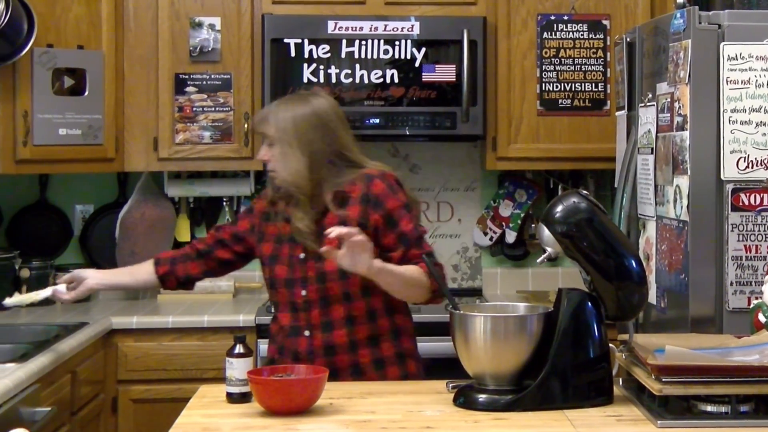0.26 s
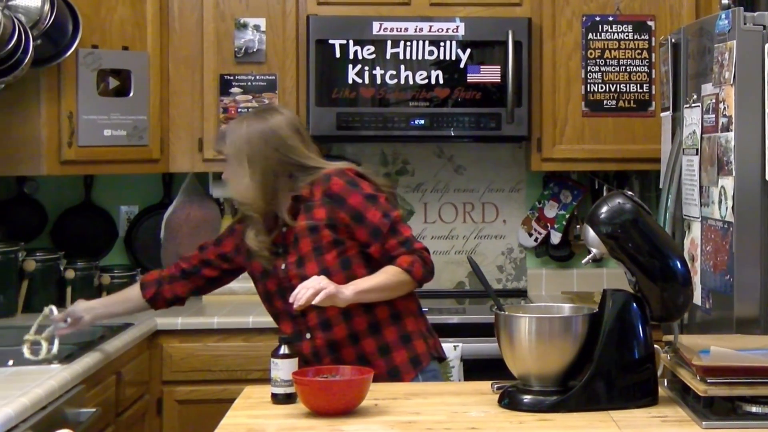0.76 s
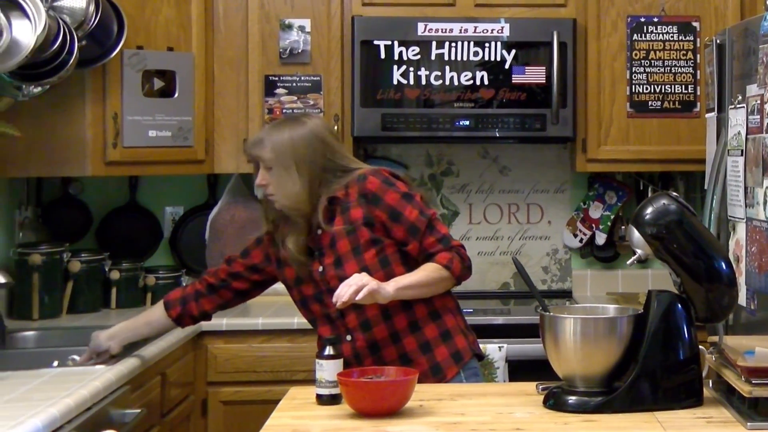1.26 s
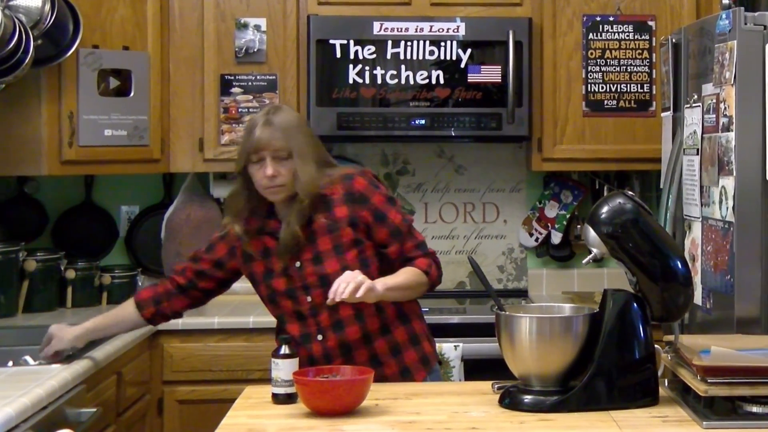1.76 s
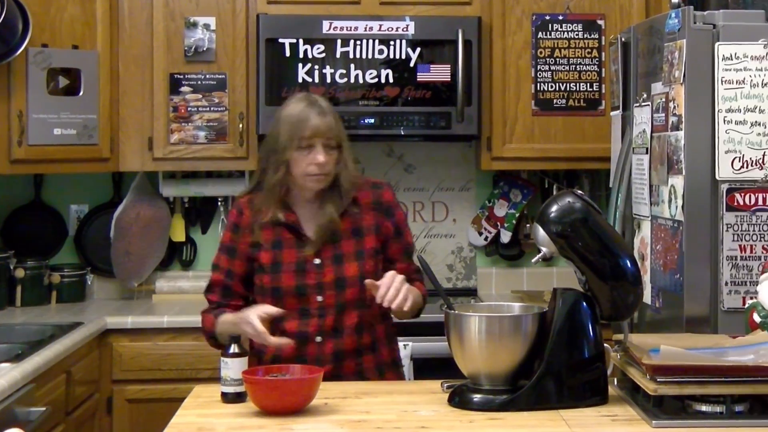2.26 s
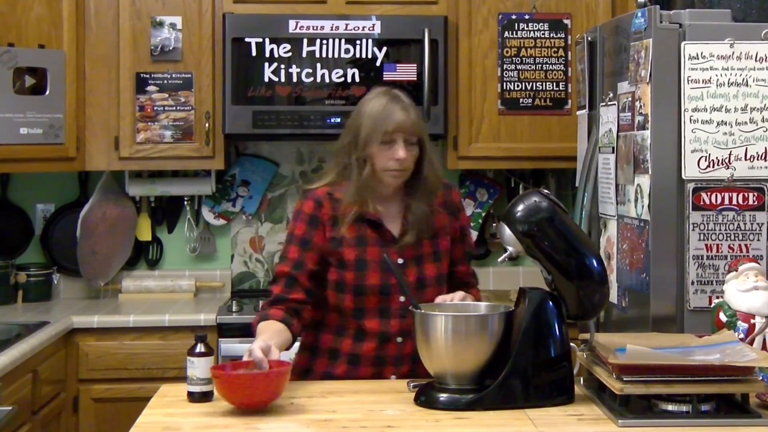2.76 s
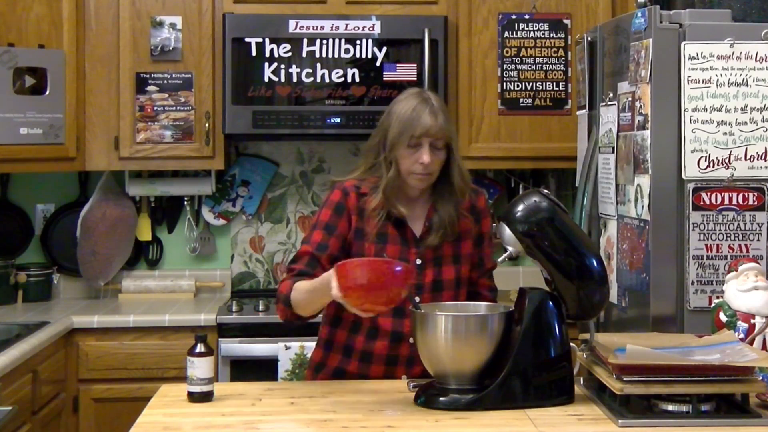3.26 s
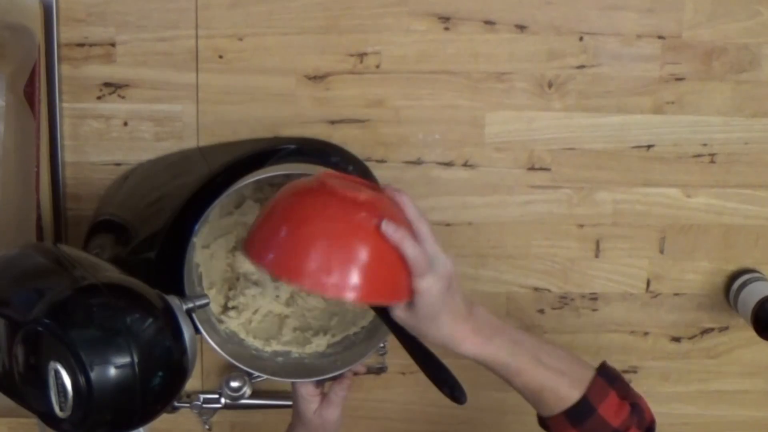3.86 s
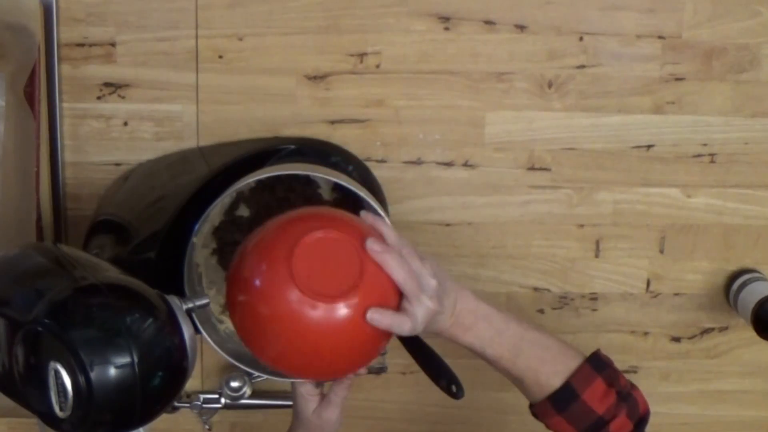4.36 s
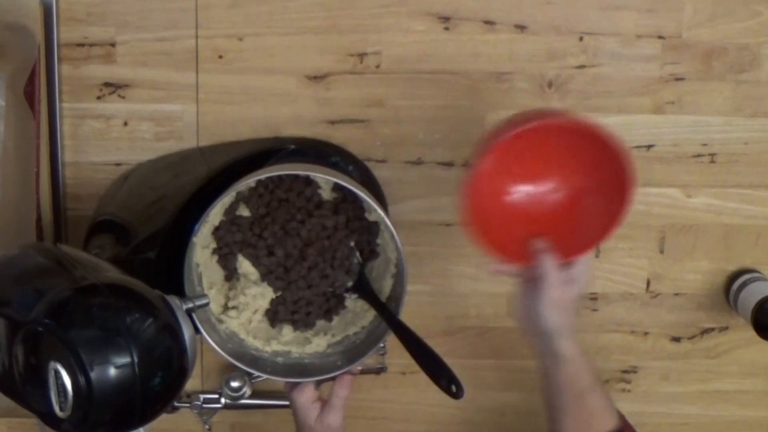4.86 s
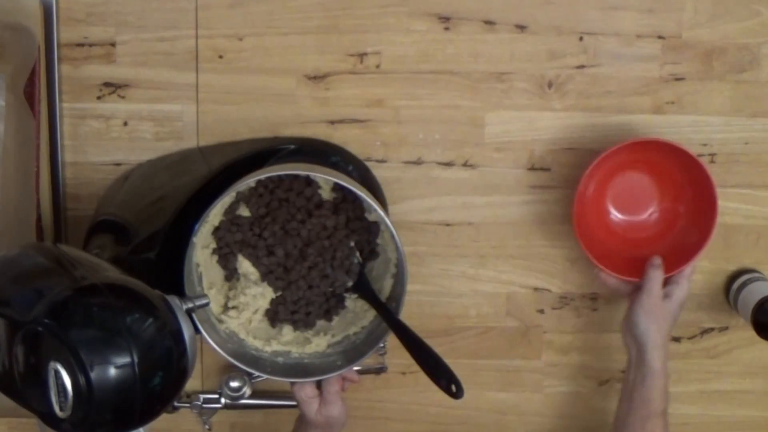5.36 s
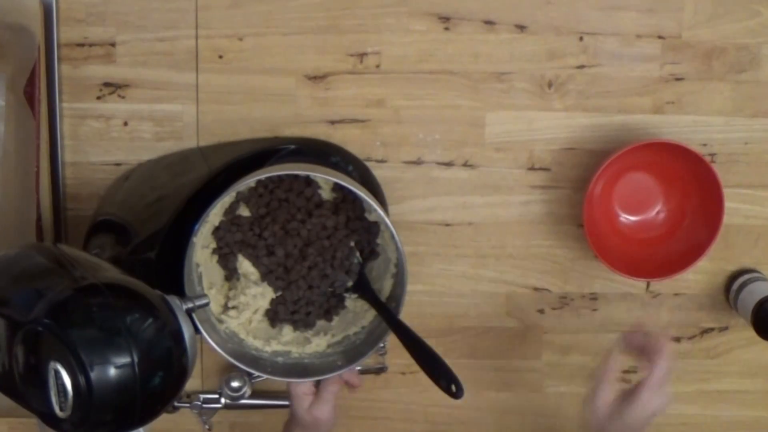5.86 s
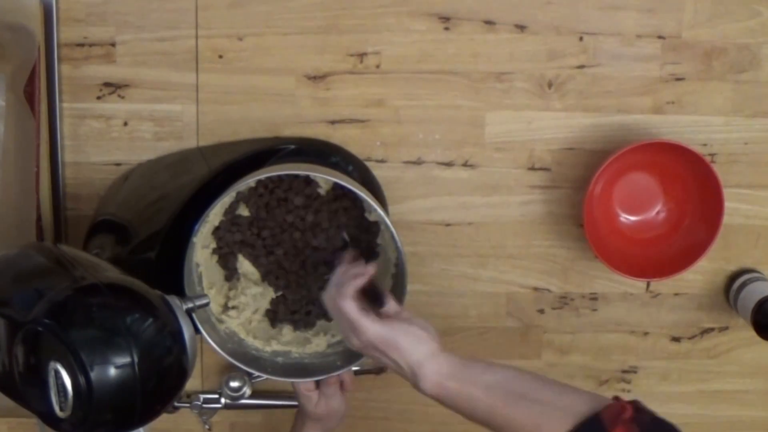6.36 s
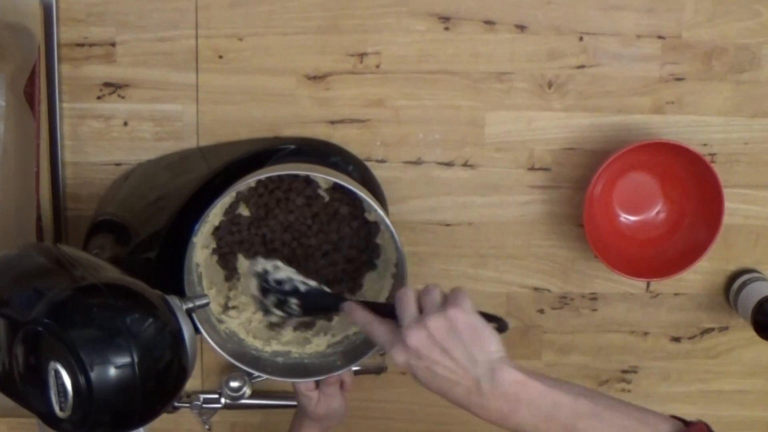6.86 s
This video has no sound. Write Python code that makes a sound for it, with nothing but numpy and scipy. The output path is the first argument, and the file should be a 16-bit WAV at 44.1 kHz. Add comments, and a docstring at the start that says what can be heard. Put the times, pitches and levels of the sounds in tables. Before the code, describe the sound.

In a quiet kitchen with a faint low motor hum, a flannel shirt rustles and a mixer paddle thuds in a sink, then clanks brightly. Chocolate chips patter and slide in a rush from a plastic bowl onto dough. The empty bowl knocks and rocks on a wooden worktop, the hum fades, and a spatula softly folds the dough. Close microphone, short room echo.

```python
"""A low, slightly wavering motor hum over dull room air, with light ticks of handling, opens a close kitchen scene.
A flannel shirt rustles by stick-slip friction; a mixer paddle bumps the sink and clanks over by modal ringing.
Chocolate chips tumble, then slide, from a plastic bowl onto dough, as scattered contacts over a granular rub.
The empty bowl rocks down on a wooden worktop as damped modes with noisy cracks, and the hum dies away.
A spatula starts to fold the dough: friction noise in slow swells, with one deep, soft bump."""
import sys
import numpy as np
from scipy import signal
from scipy.fft import rfft, irfft, next_fast_len
from scipy.io import wavfile
from scipy.ndimage import uniform_filter1d

SR = 44100
rng = np.random.default_rng(int(sys.argv[2]) if len(sys.argv) > 2 else 0)


def pcm_store(signal):
    """Save signal as 16-bit PCM."""
    levels = np.round(np.clip(np.atleast_2d(signal), -1, 1) * 32767)
    wavfile.write(sys.argv[1], SR, levels.astype(np.int16).T)


N = 314433
TIME = np.arange(N) / SR


def undb(db):
    """Level law: decibels to amplitude gain."""
    return 10 ** (np.asarray(db) / 20)


def unit(x):
    """Power normalisation: scale to rms 1."""
    return x / np.sqrt(np.mean(x ** 2))


def add(out, s, sound):
    """Superposition: mix a sound in at time s."""
    i = int(s * SR)
    out[i:i + len(sound)] += sound[:N - i]


def colour(x, points):
    """Minimum-phase filtering: a causal response through (f/Hz, level/dB) points, with unit power gain."""
    n = 2 * next_fast_len(len(x))
    hz, db = np.transpose(points)
    bin_hz = np.arange(n // 2 + 1) * SR / n
    gain = undb(np.interp(np.log(bin_hz + 1), np.log(hz), db))
    # folding the cepstrum onto positive times makes the filter causal
    cepstrum = irfft(np.log(unit(gain)))
    cepstrum[1:n // 2] *= 2
    cepstrum[n // 2 + 1:] = 0
    response = np.exp(rfft(cepstrum))
    return irfft(rfft(x, n) * response)[:len(x)]


def band(x, hz, q):
    """Resonance: a single peak with its sharpness Q."""
    centre = min(hz, SR / 3)
    sharpness = max(q, 2 * hz / SR * 2)
    return signal.lfilter(*signal.iirpeak(centre, sharpness, fs=SR), x)


def fade(t, t60):
    """Exponential damping: the level falls 60 dB in t60 seconds."""
    return np.exp(-np.log(1000) * t / t60)


def walk(rate):
    """Slow random modulation: smoothed random steps, rms 1."""
    k = int(SR / rate)
    steps = np.repeat(rng.standard_normal(N // k + 1), k)
    return unit(uniform_filter1d(steps, k)[:N])


def blows(hits, modes, spectrum, ring_db, crack_db, tail_db, crack_t60, low_t60, high_t60):
    """Modal impact: each blow cracks, rings modes and stirs a dense tail; soft contact dulls all three."""
    t = np.arange(SR) / SR
    ring = np.zeros(len(t))
    for k, (hz, db, t60) in enumerate(modes):
        # neighbouring modes start in opposite phase
        ring += (-1) ** k * undb(db) * np.sin(2 * np.pi * hz * t) * fade(t, t60)
    lowpass = signal.butter(2, 1800, fs=SR, output="sos")
    out = np.zeros(N)
    for s, db, soft_ms in hits:
        noise = rng.standard_normal(len(t))
        low = signal.sosfilt(lowpass, noise)
        tail = low * fade(t, low_t60) + (noise - low) * fade(t, high_t60)
        crack = rng.standard_normal(len(t)) * fade(t, crack_t60)
        rough = colour(undb(crack_db) * crack + undb(tail_db) * tail, spectrum)
        sound = undb(ring_db) * ring + rough
        pole = np.exp(-1000 / (soft_ms * SR))
        add(out, s, undb(db) * signal.lfilter([1 - pole], [1, -pole], sound))
    return out


def clicks(hits, rise_s, t60, q, rattle_db, rattle_t60):
    """Contact transients: tiny hard snaps with a weak rattle, each with its own brightness."""
    t, out = np.arange(SR // 20) / SR, np.zeros(N)
    shape = (1 - np.exp(-t / rise_s)) * (fade(t, t60) + undb(rattle_db) * fade(t, rattle_t60))
    shape = shape / shape.max()
    for s, db, hz in hits:
        snap = band(rng.standard_normal(len(t)) * shape, hz, q)
        # the contact time rounds off what lies an octave above
        snap = signal.lfilter(*signal.butter(2, min(2 * hz, SR * .45), fs=SR), snap)
        add(out, s, undb(db) * unit(snap) * np.sqrt(np.mean(shape ** 2)))
    return out


def grains(rate, spread_db, t60, smooth_db):
    """Granular friction: countless small contacts of unequal size over a smooth rub; rms 1."""
    struck = rng.random(N) < rate / SR
    sizes = struck * undb(spread_db * np.minimum(rng.exponential(size=N), 4))
    power = signal.lfilter([1], [1, -fade(1 / SR, t60) ** 2], sizes ** 2 + 1e-18)
    envelope = np.sqrt(power / power.mean() + undb(smooth_db) ** 2)
    return unit(rng.standard_normal(N) * envelope)


def pellets(flow, count, spread_db, centre_hz, octaves):
    """Random arrivals: (t/s, level/dB, f/Hz) contacts whose base level follows the movement's swell."""
    s, db, rise, hold, fall = flow
    chance = rng.random((count, 3))
    times = s - rise + (rise + hold + 2 * fall) * (np.arange(count) + chance[:, 0]) / count
    levels = swell(times, *flow) + spread_db * chance[:, 1] ** 2
    brightness = centre_hz * 2 ** (octaves * (chance[:, 2] - .5))
    return np.transpose([times, levels, brightness])


# a movement lies SWELL_DB down one rise before and one fall after its hold
SWELL_DB, SWELL_BEND = 20, 1.5


def swell(t, s, db, rise, hold, fall):
    """Movement envelope: level in dB at times t as one movement swells, holds and dies away."""
    away = np.maximum((s - t) / rise, 0) + np.maximum((t - s - hold) / fall, 0)
    return db - SWELL_DB * np.minimum(away, 10) ** SWELL_BEND


def strokes(rows):
    """Superposed envelopes: gain over time of several movements."""
    return sum(undb(swell(TIME, *row)) for row in rows)


def kitchen(x, wet_db, t60):
    """Diffuse reverberation: a short echo from cupboards and walls."""
    t = np.arange(SR // 2) / SR
    echo = rng.standard_normal(len(t)) * fade(t, t60) * (t > .006)
    echo = colour(echo, [(200, -1), (7000, -11), (16000, -24.5)])
    echo = echo / np.linalg.norm(echo)
    return x + undb(wet_db) * signal.fftconvolve(x, echo)[:N]


# partials of the motor hum [f/Hz, relative level/dB]
HUM_PARTIALS = [(52.1, -43.5), (104.2, -56.5), (120, -55)]
# spectrum of the room air [f/Hz, relative level/dB]
AIR_SPECTRUM = [(20, -1), (40, -4), (55, -5.5), (120, -10), (250, -10.5), (400, -14.5), (600, -17),
                (850, -24.5), (1250, -25.5), (1600, -29), (4000, -38), (4800, -38), (10000, -41),
                (16000, -47.5)]
HUM_ENDS_S, HUM_FADE_DB_PER_S = 5.75, 28


def background():
    """Tones over broadband noise: a wavering motor hum, later dying away, over the dull air of the room."""
    hum = np.zeros(N)
    for hz, db in HUM_PARTIALS:
        level = undb(db + 0.13 * walk(7))
        hum += level * np.sqrt(2) * np.sin(2 * np.pi * (hz * TIME + rng.random()))
    air = colour(rng.standard_normal(N), AIR_SPECTRUM) * undb(-50 + .5 * walk(4))
    return hum * undb(.5 - HUM_FADE_DB_PER_S * np.maximum(TIME - HUM_ENDS_S, 0)) + air


# the clearest ticks of handling, and one stray chip ticking at 4.67 s [t/s, relative level/dB, brightest f/Hz]
HANDLING_TICKS = [(.1135, -32.5, 3500), (1.135, -31, 5000), (1.170, -28, 7100), (1.1755, -27.5, 6300),
                  (1.7955, -30.5, 6260), (1.917, -31.5, 7950), (2.500, -34, 5460), (2.604, -39, 5960),
                  (2.6894, -38.5, 5060), (2.909, -38, 8000), (3.2666, -41.5, 8000), (4.6706, -33.5, 10000),
                  (5.2775, -35, 6000), (5.3535, -28.5, 11000), (5.3638, -31.5, 6040), (5.405, -35, 6800),
                  (5.4361, -32, 6100), (5.620, -38, 6900), (6.1473, -24, 5360), (6.4561, -37, 11100),
                  (6.594, -40, 5940), (6.817, -32.5, 6500), (7.0808, -31, 8500)]
# fingers squeak and scuff on the bowls [t/s, level/dB, f/Hz, length/s, sharpness Q]
FINGER_SQUEAKS = [(2.736, -57, 1230, .04, 1.9), (5.41, -58, 2800, 0.029, 7.3), (5.458, -55, 2780, .05, 9),
                  (6.176, -59, 2820, 0.048, 8.2)]


def handling():
    """Contact and friction: light ticks, and brief squeaks and scuffs of fingers as resonant noise."""
    out = undb(-2.5) * clicks(HANDLING_TICKS, rise_s=.0005, t60=.0024, q=1, rattle_db=-27, rattle_t60=.02)
    for s, db, hz, length, q in FINGER_SQUEAKS:
        noise = rng.standard_normal(int(length * SR))
        rub = band(band(noise, hz, q), hz, q)
        add(out, s, undb(db) * unit(rub * np.hanning(len(rub))))
    return kitchen(out, wet_db=-18.5, t60=0.39)


# the shirt rubs as arm and body move [t/s, relative level/dB, rise/s, hold/s, fall/s]
SHIRT_MOVES = [(.565, -57, .01, .03, .05), (.685, -40.5, .115, .025, .25), (.9, -52.5, .05, .06, .03),
               (1.13, -53, .13, .06, .14), (1.735, -52, .02, .01, .06), (1.96, -45.3, .27, .41, .19),
               (2.71, -52, .07, .12, .12), (2.92, -50, .03, .09, .04), (3.145, -46.5, .07, .02, .13),
               (5.36, -58.5, .25, .08, .35)]
# spectrum of the cloth [f/Hz, relative level/dB]
CLOTH_SPECTRUM = [(880, -17), (1500, -16.5), (2440, -8.5), (3690, -2.5), (6060, 0), (7320, -0.5),
                  (11100, -8.5), (15200, -25), (16000, -27)]


def shirt():
    """Stick-slip friction: fibres catch and let go, in uneven patches."""
    rub = grains(rate=800, spread_db=3, t60=0.0021, smooth_db=0.5) * undb(0.9 * walk(60))
    return colour(rub, CLOTH_SPECTRUM) * strokes(SHIRT_MOVES)


# the paddle bumps the sink [t/s, relative level/dB, contact softness/ms]
SINK_BLOWS = [(1.3485, 1.5, 0.18)]
# ringing of the sink [f/Hz, relative level/dB, t60/s]
SINK_RING = [(141, 4.5, 0.15), (183, 4.5, 0.093), (245, -13.5, 0.44), (343.4, -10, 0.35), (447, 0, 0.18),
             (580, -8.5, 0.26), (653, -1.5, 0.15), (717, 2.5, 0.13), (927, -1, 0.11), (1130, -22, .2),
             (1320, -13, 0.24), (2770, -18, 0.16), (3800, -13, .15)]
# spectrum of the sink's crack and tail [f/Hz, relative level/dB]
SINK_SPECTRUM = [(71, -18.5), (130, -4.5), (209, -5.5), (289, -13), (445, -11), (513, -15), (630, -8.5),
                 (1430, -17.5), (1860, -29.5), (7000, -19), (11000, -11), (16000, -24)]
# the paddle topples over and clanks [t/s, relative level/dB, contact softness/ms]
PADDLE_BLOWS = [(1.5888, -6, 0.012), (1.5922, 2, 0.025), (1.6125, 0, 0.056), (1.631, -7, 0.073)]
# ringing of the paddle [f/Hz, relative level/dB, t60/s]
PADDLE_RING = [(279, -6, 0.54), (1050, -3, 0.21), (1476, -10, .26), (1873, -9, .29), (2650, -11, 0.33),
               (2760, -4, 0.15), (3220, 3, 0.048), (3965, 5.5, 0.23), (4110, -7, .22), (5740, 7, 0.18),
               (6340, -5, .3), (7935, -1, .15), (9950, 7, 0.055), (11850, -8, .15)]
# spectrum of the paddle's crack and tail [f/Hz, relative level/dB]
PADDLE_SPECTRUM = [(88, -10), (150, -5.5), (457, -5), (900, -7.5), (1250, -10.5), (2700, -6), (3550, -12),
                   (4200, -5.5), (5150, -20), (5800, -13), (11000, -13), (16000, -23)]


def paddle():
    """Modal impact: the paddle thuds on the sink floor, then clanks over on its side."""
    thud = blows(SINK_BLOWS, SINK_RING, SINK_SPECTRUM, ring_db=-26.5, crack_db=-20, tail_db=-24,
                 crack_t60=0.054, low_t60=0.41, high_t60=0.28)
    clank = blows(PADDLE_BLOWS, PADDLE_RING, PADDLE_SPECTRUM, ring_db=-40, crack_db=-22.5, tail_db=-34,
                  crack_t60=.02, low_t60=.4, high_t60=.2)
    return thud + clank


# the hand takes hold of the plastic bowl [t/s, relative level/dB, contact softness/ms]
HAND_BLOWS = [(2.520, -39, .5), (2.746, -40, 0.036)]
# the bowl's foot meets the worktop [t/s, relative level/dB, contact softness/ms]
FOOT_BLOWS = [(5.7248, 1.5, 0.033), (5.7782, -8, 0.033), (5.7821, -0.5, 0.16), (5.9015, -8, 0.19),
              (5.9333, -6.5, 0.17)]
# bowl and worktop ring together [f/Hz, relative level/dB, t60/s]
BOWL_RING = [(72.7, -14, 0.26), (190.7, -3.5, 0.25), (256.4, -4, 0.23), (298, -22, 0.3), (398.2, 1.5, 0.21),
             (424, -4.5, 0.19), (459, -5.5, 0.126), (478, 3, 0.1), (598, -1.5, 0.15), (613.6, 3, 0.13),
             (644, -7.5, 0.34), (695, -3.5, 0.2), (764, -13, 0.27), (844, -1.5, 0.17), (870, -7, 0.29),
             (974, -5.5, 0.21), (1118, -13, 0.32), (1205, -9.5, 0.24), (1310, -26, 0.28), (1437, -20, 0.21),
             (1495, -11, 0.13), (1974, -14.5, 0.11), (2120, -29, 0.23), (2200, -5.5, 0.081),
             (2920, -18, 0.053), (3680, -39, 0.37), (3730, -17, 0.21), (4150, -40, .26), (5800, -15, 0.081),
             (7170, -13.5, 0.078), (9800, -13, 0.097)]
# spectrum of the bowl's crack and tail [f/Hz, relative level/dB]
BOWL_SPECTRUM = [(71, -16), (120, -44), (173, -10), (308, -7.5), (385, -7.5), (470, -1), (525, -14.5),
                 (580, -1.5), (742, -12.5), (856, -0.5), (1250, -16.5), (1700, -22), (2150, -13.5),
                 (2600, -32), (3750, -22.5), (5000, -28), (10000, -30), (14000, -42), (16000, -44)]


def bowl():
    """Coupled modes: the bowl is picked up; later, empty, it lands and rocks on its foot."""
    return blows(HAND_BLOWS + FOOT_BLOWS, BOWL_RING, BOWL_SPECTRUM, ring_db=-17.0, crack_db=-6.5,
                 tail_db=-18.5, crack_t60=0.015, low_t60=0.27, high_t60=.26)


# the loudest single chips strike the bowls [t/s, relative level/dB, brightest f/Hz]
CHIP_STRIKES = [(3.5975, -30, 14000), (3.6899, -40, 6000), (3.6995, -21, 7300), (3.7587, -22.5, 8400),
                (3.8052, -21, 6500), (3.8516, -20.5, 8100), (3.884, -21, 8000), (3.8870, -13, 9300),
                (3.9013, -10.5, 9600), (3.9127, -13.5, 5640), (3.9465, -16, 9000), (3.9542, -9, 6500),
                (3.9805, -14, 8000), (3.9843, -11, 10200), (3.9885, -13, 6000), (4.0003, -12, 6500),
                (4.0284, -19, 7860), (4.0547, -17, 6000), (4.0712, -8.5, 5900), (4.2904, -17, 6600),
                (4.3152, -8, 7700), (4.3591, -16.5, 8200), (4.4008, -19, 9200)]
# spectrum of the dropping and loose chips [f/Hz, relative level/dB]
CHIP_SPECTRUM = [(300, 6), (1200, -10), (1750, 1.5), (2050, -3), (2400, -4.5), (3100, -16), (4300, -10),
                 (5100, -2.5), (5800, -5), (10000, -8), (16000, -12)]
# loose chips tumble out [t/s, relative level/dB, rise/s, hold/s, fall/s]
TUMBLE_FLOW = (3.89, -27, .008, .13, .1)
# the whole heap slides [t/s, relative level/dB, rise/s, hold/s, fall/s]
SLIDE_FLOW = (4.29, -26, .235, .04, .25)
# the last chips trickle after it [t/s, relative level/dB, rise/s, hold/s, fall/s]
TRICKLE_FLOW = (4.56, -43, .03, .1, .2)
# spectrum of the sliding and trickling chips [f/Hz, relative level/dB]
SLIDE_SPECTRUM = [(150, -42), (250, -10), (330, -4), (500, -3.5), (922, -12.5), (1120, -9), (1350, -11.5),
                  (2090, -5), (2760, -17), (3980, -8.5), (4900, -3), (10500, 0.5), (13400, 0), (16000, -10)]
# the bowl wall rings under the chips [f/Hz, sharpness Q, relative level/dB]
WALL_RESONANCES = [(1620, 27, -2.5), (2480, 42, 4), (5080, 35, -2), (10250, 45, 2)]


def chips():
    """Granular flow: chips drop, tumble, slide as a heap and trickle, exciting the bowl wall's resonances."""
    drops = clicks(CHIP_STRIKES, rise_s=0.0012, t60=0.003, q=1.44, rattle_db=-26, rattle_t60=0.027)
    tumbling = pellets(TUMBLE_FLOW, count=60, spread_db=13, centre_hz=7000, octaves=1.2)
    loose = clicks(tumbling, rise_s=.0008, t60=0.006, q=2.0, rattle_db=-18, rattle_t60=0.035)
    sliding = pellets(SLIDE_FLOW, count=220, spread_db=12, centre_hz=6800, octaves=2.4)
    rolling = clicks(sliding, rise_s=.0004, t60=.009, q=6, rattle_db=-20, rattle_t60=.03)
    trickling = pellets(TRICKLE_FLOW, count=40, spread_db=9, centre_hz=8500, octaves=1)
    late = clicks(trickling, rise_s=.0004, t60=.003, q=1.3, rattle_db=-22, rattle_t60=.025)
    heap = strokes([SLIDE_FLOW]) * grains(rate=2000, spread_db=3.5, t60=.003, smooth_db=-2)
    falling = colour(undb(-1) * drops + undb(-4.2) * loose, CHIP_SPECTRUM)
    flowing = colour(heap + undb(-8.3) * rolling + late, SLIDE_SPECTRUM)
    contacts = falling + flowing
    wall = sum(undb(db) * band(contacts, hz, q) for hz, q, db in WALL_RESONANCES)
    return kitchen(contacts + undb(-4) * wall, wet_db=-16, t60=.35)


# a soft brush as the empty bowl is moved aside [t/s, relative level/dB, rise/s, hold/s, fall/s]
BOWL_BRUSHES = [(4.975, -54, .025, .03, .04), (5.1, -65, .1, .1, .1)]
# the spatula's pushes in the dough [t/s, relative level/dB, rise/s, hold/s, fall/s]
DOUGH_FOLDS = [(6.104, -58, .015, .005, .02), (6.18, -59, .03, .02, .2), (6.42, -61, .15, .27, .1),
               (6.83, -46.5, .11, .18, .3)]
# spectrum of brush and dough [f/Hz, relative level/dB]
DOUGH_SPECTRUM = [(240, -25), (400, -11), (570, 1), (800, -9), (1160, -13), (2090, -8), (2800, -17.5),
                  (3870, -14.5), (4730, -5), (11200, -5), (16000, -19.5)]


def spatula():
    """Adhesive friction: a soft brush, then dough crackling round the blade; one push gives a deep bump."""
    crackle = grains(rate=400, spread_db=4, t60=.004, smooth_db=-1)
    moves = strokes(BOWL_BRUSHES + DOUGH_FOLDS)
    out = colour(crackle, DOUGH_SPECTRUM) * moves * undb(-1.0 + 0.65 * walk(25))
    t = np.arange(int(.13 * SR)) / SR
    bump = np.hanning(len(t)) * np.sin(2 * np.pi * 42 * t)
    add(out, 6.44, undb(-37) * bump)
    return out


def scene():
    """Superposition: all sources at one microphone."""
    sources = background() + handling() + shirt() + paddle() + bowl() + chips() + spatula()
    return sources[None]


def gain_control(x, threshold_db, memory_s):
    """Level compression: the gain sinks as loud sound builds up, and creeps back afterwards."""
    pole = np.exp(-1 / (memory_s * SR))
    power = signal.lfilter([1 - pole], [1, -pole], x ** 2)
    return x / np.sqrt(1 + power / undb(threshold_db) ** 2)


TOP_HZ = 15850


def record(dry):
    """Compression and band-limiting: the recorder ducks under loud sound and cuts the top."""
    held = gain_control(dry, threshold_db=-20.5, memory_s=0.42)
    return signal.sosfilt(signal.ellip(10, .2, 80, TOP_HZ, fs=SR, output="sos"), held)


dry = scene()
out = record(dry)
pcm_store(out)
```